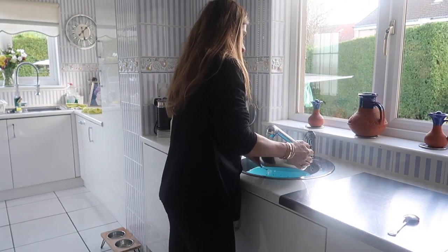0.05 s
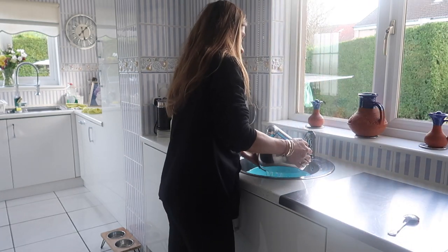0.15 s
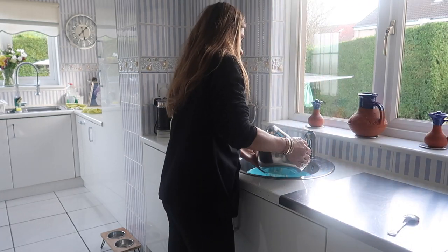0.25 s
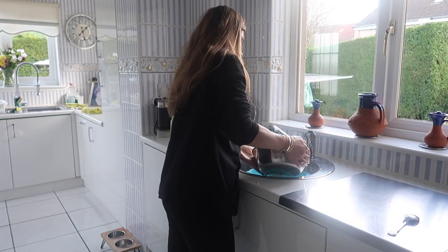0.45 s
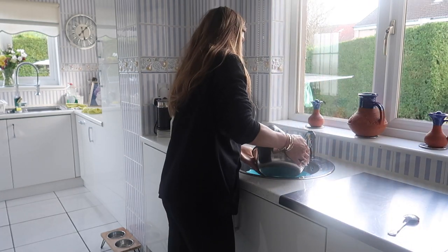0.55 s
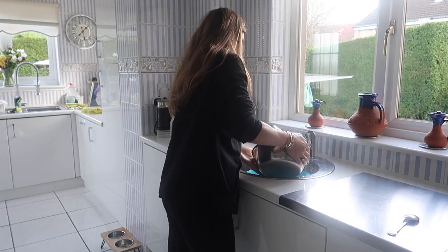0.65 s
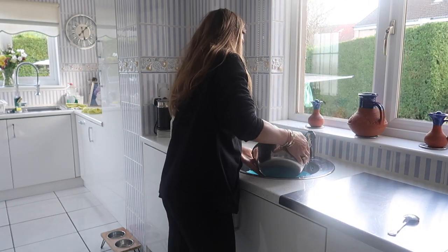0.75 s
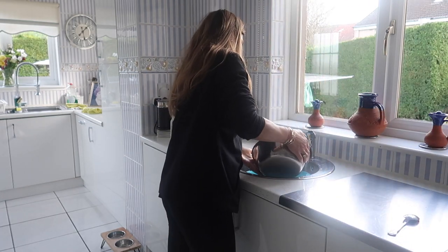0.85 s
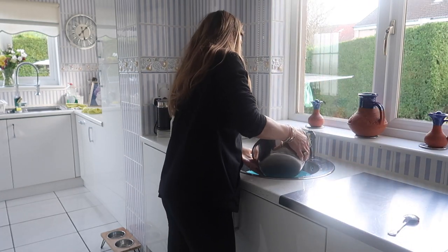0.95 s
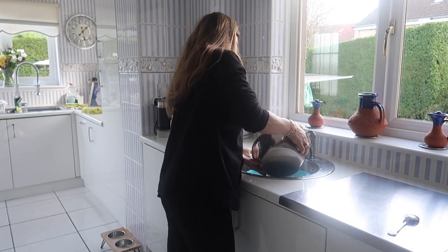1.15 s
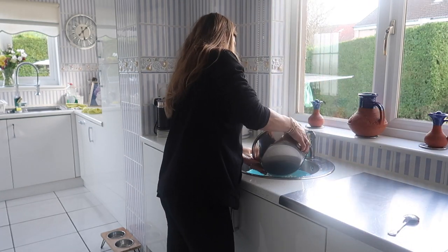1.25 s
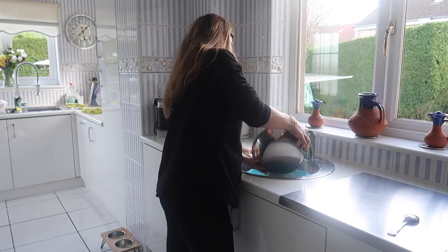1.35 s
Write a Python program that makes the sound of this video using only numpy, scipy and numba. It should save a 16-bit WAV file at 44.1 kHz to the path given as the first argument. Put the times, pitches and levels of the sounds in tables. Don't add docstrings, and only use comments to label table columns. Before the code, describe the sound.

Soaked beans tumble from a steel bowl into a ringing metal colander, water rushing after them

```python
import sys
import numpy as np
from scipy import signal
from scipy.fft import rfft, irfft, next_fast_len
from scipy.io import wavfile
from scipy.ndimage import uniform_filter1d
from numba import njit

SR = 44100
rng = np.random.default_rng(int(sys.argv[2]) if len(sys.argv) > 2 else 0)


def nominal_scale(level):
    x = np.asarray(level, float) / 20
    return 10 ** x


def unload_wav(signal):
    wavfile.write(
        sys.argv[1],
        SR,
        np.round(np.clip(np.atleast_2d(signal).T, -1, 1) * 32767).astype(np.int16),
    )


N = 61739

SCATTER_DB = 2.2
HARDEST = .97


def unit(x):
    return x / np.sqrt(np.mean(x ** 2))


def curve(table):
    return np.interp(np.arange(N) / SR, *np.array(table).T)


def colour(x, table):
    n = next_fast_len(2 * N)
    hz, db = np.array(table).T
    bins = np.arange(n // 2 + 1) * SR / n + 1
    gain = nominal_scale(np.interp(np.log(bins), np.log(hz), db))
    return irfft(rfft(x, n) * gain, n)[..., :N]


def walk(rate):
    k = int(SR / rate)
    steps = np.repeat(rng.standard_normal(N // k + 1), k)
    return uniform_filter1d(uniform_filter1d(steps, k), k)[:N]


def strengths(chance):
    return nominal_scale(-SCATTER_DB * np.log(1 - HARDEST * chance))


def taps(count):
    row, x = rng.random((count, 3)), np.zeros(N)
    x[(row[:, 0] * N).astype(int)] = np.sign(row[:, 1] - .5) * strengths(row[:, 2])
    return unit(x)


def ring(x, hz, t60):
    pole = np.exp(2j * np.pi * hz / SR - np.log(1000) / (max(t60, .01) * SR))
    return signal.lfilter([1], [1, -pole], x).imag * np.sqrt(2 * (1 - abs(pole) ** 2))


@njit
def grains(at, hz, cycles, size, glide):
    y = np.zeros(N)
    for k in range(len(at)):
        w, m = 2 * np.pi * hz[k] / SR, int(5 * cycles * SR / hz[k])
        z, p, g = size[k] + 0j, np.exp(1j * w - 5. / m), np.exp(1j * w * glide / m)
        for i in range(at[k], min(at[k] + m, N)):
            y[i] += z.imag
            z *= p
            p *= g
    return y


def bursts(table, count, spread_s, cycles, spread, glide=0.086):
    t, db, hz = np.repeat(np.array(table), count, axis=0).T
    row = rng.random((len(t), 3))
    at = ((t + spread_s * row[:, 0] ** 2) * SR).astype(np.int64)
    pitch = hz * np.exp(spread * (row[:, 1] - .5))
    return grains(at, pitch, cycles, nominal_scale(db) * (0.24 + 0.44 * row[:, 2]), glide)


# (frequency [Hz], level [dB rms])
FRIDGE_HUM = [(48.4, -54), (102.3, -58), (296.1, -50), (344.5, -55.5)]


def fridge():
    t, hum = np.arange(N) / SR, 0
    for hz, db in FRIDGE_HUM:
        level = nominal_scale(db + 3.0 + 3.7 * walk(8.8))
        hum = hum + level * np.sin(2 * np.pi * hz * t + 2 * np.pi * rng.random())
    return hum


# (frequency [Hz], level [dB])
ROOM_COLOUR = [(20, -15), (50, -20), (130, -8.5), (200, -3.5), (330, 0), (700, -22.5), (4000, -29.5),
               (15000, -40)]


def room_air():
    return nominal_scale(-42.5 - 9.5) * unit(colour(rng.standard_normal((2, N)), ROOM_COLOUR))


# (time [s], level [dB])
BEAN_STREAM = [(.15, -75), (.158, -45.5), (.194, -36), (.201, -17.5), (.246, -19), (.252, -25), (.259, -16),
               (.263, -12), (.31, -17), (.395, -12.5), (.408, -16.5), (.425, -13), (.62, -19.5), (.73, -27),
               (.8, -24.5), (1.1, -34.5), (1.31, -34), (1.37, -31.5)]


def bean_level():
    return curve(BEAN_STREAM)


# (frequency [Hz], level [dB])
SOFT_BLOW = [(40, -20), (80, 0), (4000, 0), (12000, -30)]


def soften(x):
    return colour(x, SOFT_BLOW)


# (frequency [Hz], level [dB], fade time t60 [s])
COLANDER_TONES = [(612, -10.5, 0.9), (660, -19, 0.086), (782, -16, 0.2), (891, -9, 0.12), (1006, -24, 0.1),
                  (1266, -35, 0.46), (1187, -6, 0.3), (1376, 0.5, 0.37), (1460, -8, 0.083),
                  (1650, -13, 0.38), (1807, 0.5, 0.14), (2052, -2.5, 0.24), (2070, -3.5, 0.27),
                  (2186, -10, 0.11)]
# (frequency [Hz], level [dB])
KNOCK_COLOUR = [(200, -48), (550, -45), (660, -11), (1080, -10.5), (1420, -1.5), (2100, -1.5), (2800, -4.5),
                (4500, -9.5)]


def loose_beans(flow):
    count = int(2600 * N / SR)
    rings = 0
    for hz, db, t60 in COLANDER_TONES:
        rings = rings + nominal_scale(db) * ring(flow * taps(count // 2), hz, t60)
    row = rng.random((count, 3))
    at, pitch = (row[:, 0] * N).astype(np.int64), 550 * 5.41 ** row[:, 1]
    knocks = grains(at, pitch, 2.2, strengths(row[:, 2]), 0.0067)
    return nominal_scale(-7.5 - 8) * soften(rings) + nominal_scale(-3.5) * flow * unit(colour(knocks, KNOCK_COLOUR))


# (time [s], peak level [dB], pitch [Hz],
# length [s])
SINGING_RUNS = [(.154, -39, 1365, 0.024), (.198, -15, 2030, 0.029), (.198, -20.5, 898, 0.04),
                (.212, -19, 782, 0.042), (.222, -16.5, 1378, 0.037), (.26, -24, 1698, 0.038),
                (.262, -19, 898, 0.026), (.295, -9.5, 1376, 0.028), (.318, -20.5, 804, 0.059),
                (.34, -12.5, 765, 0.04), (.345, -15.5, 701, 0.025), (.35, -17, 1368, 0.091),
                (.385, -17, 869, 0.039), (.413, -15.5, 2030, 0.02), (.415, -26, 1370, 0.052),
                (.43, -12.5, 782, 0.038), (.4, -25, 612, 0.083), (.225, -28, 612, 0.15),
                (.3, -25.5, 612, 0.18), (.445, -21.5, 1372, 0.054), (.48, -23.5, 1460, 0.032),
                (.498, -16, 1720, 0.017), (.51, -20, 700, 0.032), (.54, -22, 786, 0.032),
                (.562, -16, 1440, 0.024), (.598, -19, 1822, 0.069), (.605, -20, 1338, 0.043),
                (.635, -19.5, 1418, 0.059), (.68, -23, 700, 0.028), (.754, -18, 1520, 0.018),
                (.76, -24, 2042, 0.036), (1.038, -34, 3450, 0.014), (1.09, -36.5, 788, 0.069),
                (1.165, -31, 790, .09), (1.235, -32.5, 779, 0.066), (1.29, -34, 791, .07),
                (1.35, -36.5, 793, 0.06), (.76, -29.5, 770, 0.062), (.81, -25, 1400, 0.032),
                (.85, -25.5, 2048, 0.056), (1.345, -34.5, 2075, 0.034), (1.243, -35, 4750, 0.017)]


def singing_metal():
    t, out = np.arange(N) / SR, 0
    for at, db, hz, length in SINGING_RUNS:
        u = np.clip((t - at) / (0.4 * length), 0, 30)
        swell = (u * np.exp(1 - u)) ** 2
        out = out + nominal_scale(db) * swell * np.sin(2 * np.pi * hz * (t - at))
    return out * nominal_scale(2 * walk(150))


# (time [s], peak level [dB], pitch [Hz])
BEAN_CLUMPS = [(0.157, -33, 1450), (0.1974, -4.5, 1910), (0.2048, -15.5, 2120), (0.2298, -10, 1450),
               (0.2374, -8, 1470), (0.2436, 3, 1870), (0.2603, 4, 1950), (0.2643, -10, 1400),
               (0.2784, 0.5, 1830), (0.288, -4, 1710), (0.2981, 0, 1420), (0.3087, 0.5, 1480),
               (0.3228, -5, 1350), (0.3364, 0.5, 1530), (0.3543, 2, 1390), (0.3644, -2, 1336),
               (0.381, -15, 1350), (0.3939, -12, 1380), (0.4207, -10, 1320), (0.4464, -5, 1376),
               (0.4556, -5, 1380), (0.4674, -2, 1380), (0.4814, -2, 1440), (0.4967, -5, 1460),
               (0.5265, -11, 1760), (0.5463, 2.5, 1640), (0.5706, -11, 1460), (0.5944, -10, 1850),
               (0.609, -5, 1760), (0.62, -4, 1550), (0.6323, -9.5, 1360), (0.6436, -1, 1460),
               (0.6619, -9, 1450), (0.6911, -6.5, 1560), (0.7001, -3.5, 1390), (0.7344, -11.5, 1460),
               (0.7587, -17, 1560), (0.7734, -12, 1320), (0.7857, -21, 1820), (0.816, -11, 1530),
               (0.839, -16, 1770), (0.8694, -19, 2100), (0.8884, -19, 2010), (0.9188, -14, 1820),
               (0.978, -16, 1380), (1.03, -21, 1410), (1.0461, -19, 1460), (1.1056, -19, 1370),
               (1.1388, -21, 1460), (1.3324, -18, 2120), (1.3494, -18, 1065), (1.3673, -18, 2120),
               (1.3849, -24, 1250)]


def bean_clumps():
    return bursts(BEAN_CLUMPS, count=2, spread_s=.002, cycles=3., spread=.12)


# (frequency [Hz], level [dB])
HEAVY_COLOUR = [(100, -50), (530, -24), (610, -4), (750, 0), (3500, 0), (12000, -30)]


def beans():
    flow = nominal_scale(bean_level() + 1.4 * walk(39.64))
    clumps = bean_clumps()
    loose = loose_beans(flow)
    return loose + colour(nominal_scale(-1.5) * clumps + nominal_scale(-2) * singing_metal(), HEAVY_COLOUR)


# (time [s], peak level [dB], pitch [Hz])
SPLASH_EVENTS = [(.165, -50, 4300), (.205, -38, 4350), (.235, -34.5, 4970), (.34, -27, 5440),
                 (.393, -23.5, 3850), (.472, -30, 8000), (.54, -41, 6000), (.635, -37.5, 8200),
                 (.745, -30.5, 4840), (.815, -39.5, 8240), (.862, -29.5, 4870), (.872, -39, 10400),
                 (.925, -27.5, 5500), (1.04, -30.5, 3530), (1.05, -39, 9600), (1.12, -33, 4970),
                 (1.25, -35.5, 4740), (1.265, -39, 7250), (1.295, -32, 5140), (1.37, -34, 6000)]


def splashes():
    return nominal_scale(2) * bursts(SPLASH_EVENTS, count=14, spread_s=.025, cycles=6.6, spread=0.505, glide=0.3)


# (time [s], level [dB])
WATER_FLOW = [(0, -63), (.17, -64.5), (.192, -56.5), (.207, -36.5), (.3, -40), (.5, -39.5), (.65, -41.5),
              (.88, -42.5), (1.05, -42.5), (1.15, -44), (1.3, -46.5), (1.4, -43.5)]


def water_level():
    return curve(WATER_FLOW)


# (frequency [Hz], level [dB])
SPRAY_COLOUR = [(200, -21.5), (600, 9.5), (2000, -1), (4000, -3.5), (7000, -12.5), (10500, -22),
                (13000, -31), (15500, -60)]


def spray(patches):
    row = rng.random((int(5000 * N / SR), 3))
    at, pitch = (row[:, 0] * N).astype(np.int64), 1500 * 7.53 ** row[:, 1]
    fizz = grains(at, pitch, 2.3, nominal_scale(-3.5 * np.log(1.002 - row[:, 2])), 0.53)
    x = unit(colour(0.39 * unit(fizz) + rng.standard_normal(N), SPRAY_COLOUR))
    layers = [0 * x]
    for hz in 2800 * 1.6 ** np.arange(4):
        layers.append(signal.sosfilt(signal.butter(4, hz, fs=SR, output="sos"), x))
    layers.append(x)
    return np.sum(np.diff(layers, axis=0) * patches, axis=0)


# (frequency [Hz], level [dB], fade time t60 [s])
BASIN_TONES = [(83, -6.5, 0.046), (143, -13.5, 0.36), (409.6, -7, 0.23), (447.5, -9.5, 0.079),
               (3040, -14, 0.024)]


def basin():
    flow = nominal_scale(water_level() + 0.091 * (bean_level() + 3.5))
    floor_hz = 280 * (1 - .15 * np.arange(N) / N) * (1 + .028 * walk(8))
    phase = 2 * np.pi * np.cumsum(floor_hz) / SR
    decay = nominal_scale(-60 / (.12 * SR))
    a, b = (signal.lfilter([np.sqrt(1 - decay ** 2)], [1, -decay], flow * taps(1500)) for _ in range(2))
    floor = (a + 0.34 * flow) * np.sin(phase) + b * np.cos(phase)
    sheet = 0
    for hz, db, t60 in BASIN_TONES:
        sheet = sheet + nominal_scale(db) * ring(flow * taps(1500), hz, t60)
    steep = [(150, -62), (225, 3), (300, -2.5), (400, -35), (2000, -30)]
    return nominal_scale(1) * (soften(sheet) + nominal_scale(2) * colour(floor, steep))


def echo(x):
    t = np.arange(int(.5 * SR)) / SR
    tail = rng.standard_normal((2, len(t))) * nominal_scale(-60 * t / 0.26) * (t > .004)
    return signal.fftconvolve(x[None], tail / np.sqrt(np.sum(tail ** 2) / 2), axes=1)[:, :N]


# (frequency [Hz], level [dB])
WATER_WIDTH = [(30, -50.5), (150, -19), (2500, -17), (4000, -6.5), (6000, -2), (9000, 1), (13000, 3.5)]
# (frequency [Hz], level [dB])
ROOM_WIDTH = [(30, -35), (200, -17), (1000, 9.5), (5000, 3.5)]


def scene():
    surge = nominal_scale(water_level() + 9 + 1.65 * walk(8.55) + 0.34 * walk(24.8))
    patches = nominal_scale([1.18 * walk(13.05) for _ in range(5)])
    splash = np.array([splashes(), splashes()])
    steel = beans() + basin()
    water = surge * np.array([spray(patches), spray(patches)]) + splash
    hum, air = fridge(), room_air()
    wet = echo(steel + water[0])
    mid = steel + water[0] + nominal_scale(-7.5) * wet[0] + hum + air[0]
    side = colour(wet[1] * 0.66 + water[1] * 0.72, WATER_WIDTH) + colour(air[1], ROOM_WIDTH)
    side = side - .02 * mid
    return np.array([mid + side, mid - side])


# (frequency [Hz], level [dB])
MIC_RESPONSE = [(20, -24), (40, -1.5), (11000, 0), (13000, -1), (15000, -6)]


def microphone(dry):
    return colour(dry, MIC_RESPONSE)


SHARE_KEPT = (.7, .2)


def thin(side):
    hz, t, z = signal.stft(side, SR, nperseg=2048)
    band = np.digitize(hz, [200, 500, 700, 950, 1300, 1700, 2200, 2700, 3200])
    lucky = rng.random((10, len(t)))[band] < np.interp(t, [.4, 1.1], SHARE_KEPT)
    keep = lucky | (hz[:, None] > 3200) | (band[:, None] == 1) | (t < .2)
    return signal.istft(z * keep, SR, nperseg=2048)[1][:N]


def low_pass(x):
    return signal.sosfilt(signal.butter(12, 15010, fs=SR, output="sos"), x)


def record(dry):
    left, right = microphone(dry)
    mid, side = (left + right) / 2, thin((left - right) / 2)
    return low_pass(np.array([mid + side, mid - side]))


dry = scene()
out = record(dry)
unload_wav(out)
```